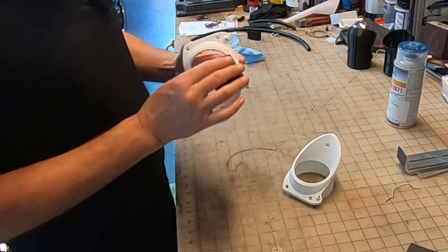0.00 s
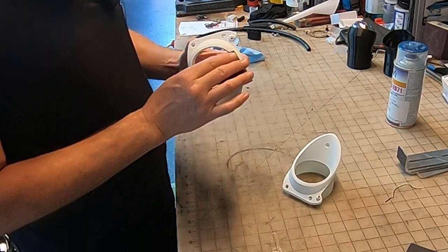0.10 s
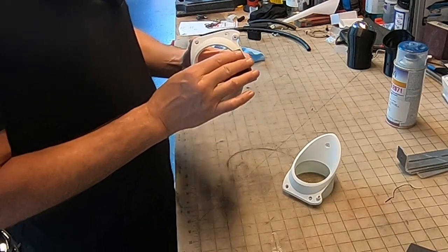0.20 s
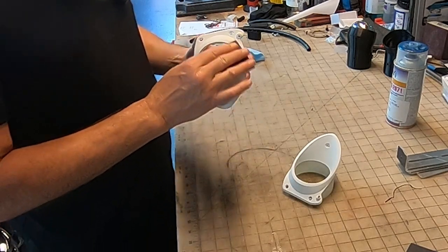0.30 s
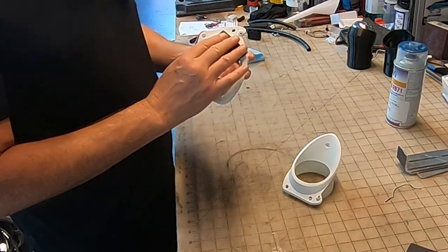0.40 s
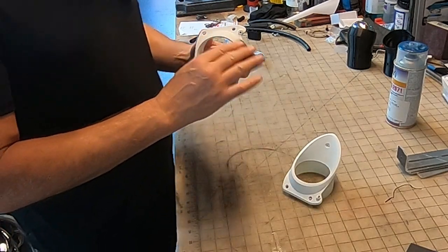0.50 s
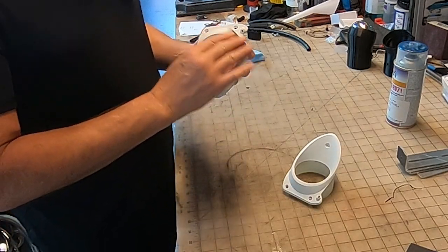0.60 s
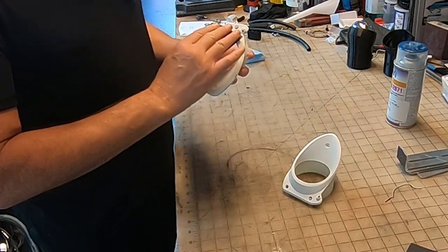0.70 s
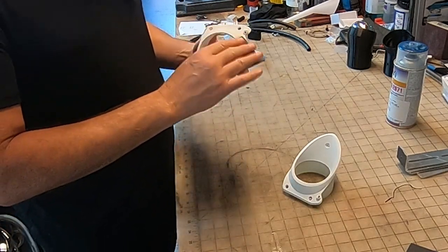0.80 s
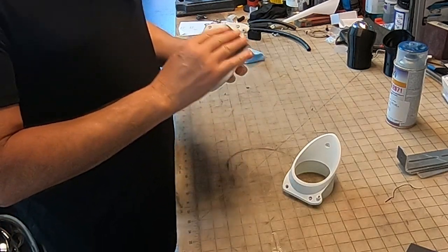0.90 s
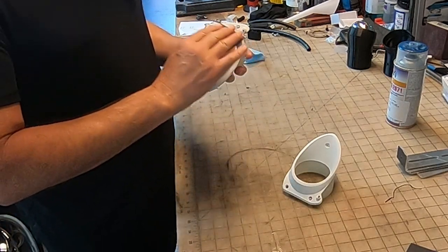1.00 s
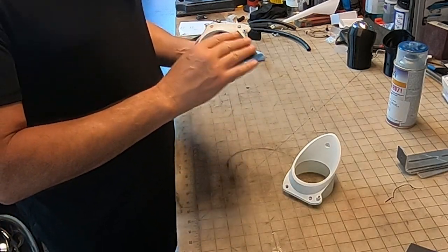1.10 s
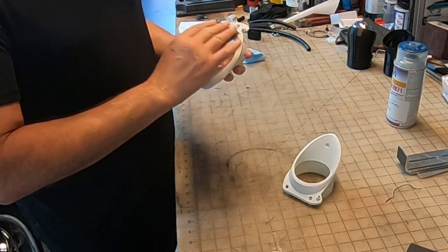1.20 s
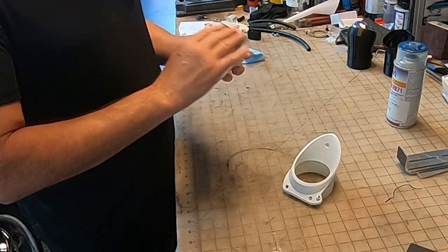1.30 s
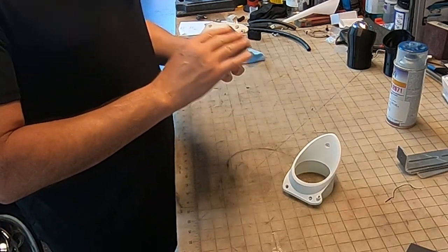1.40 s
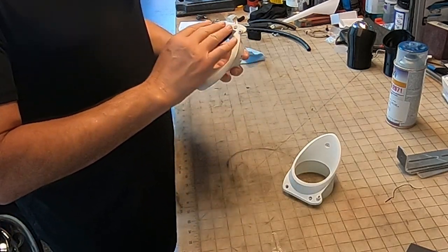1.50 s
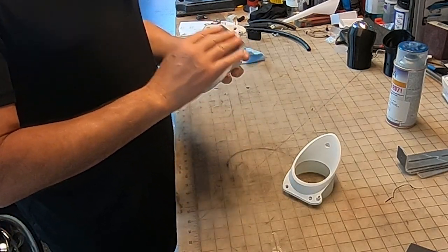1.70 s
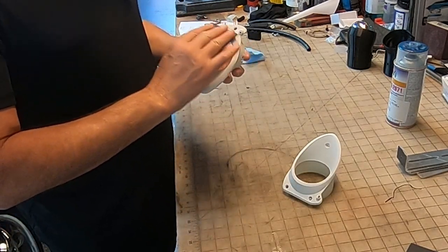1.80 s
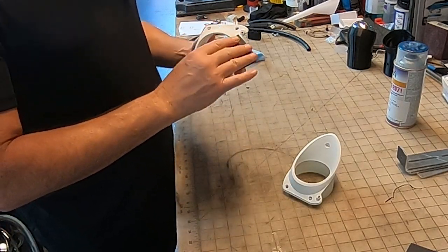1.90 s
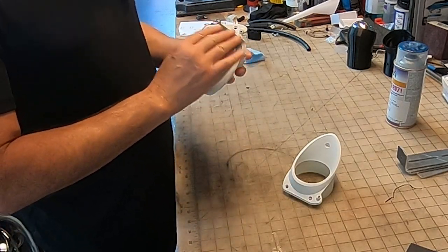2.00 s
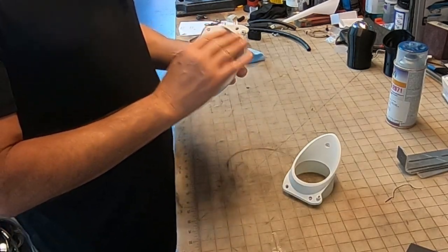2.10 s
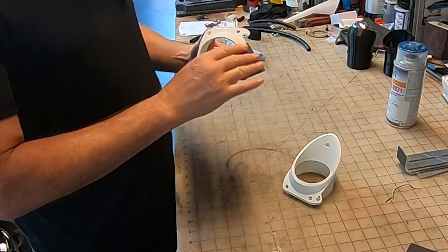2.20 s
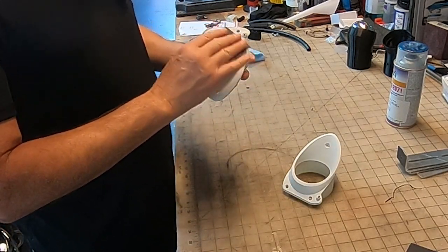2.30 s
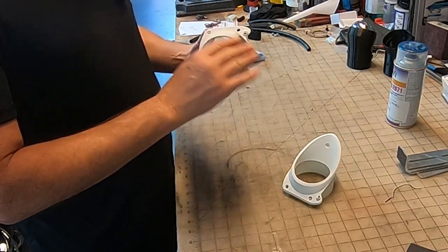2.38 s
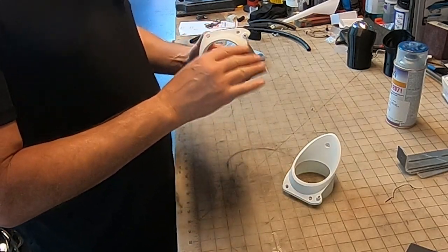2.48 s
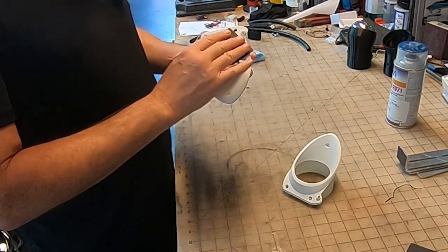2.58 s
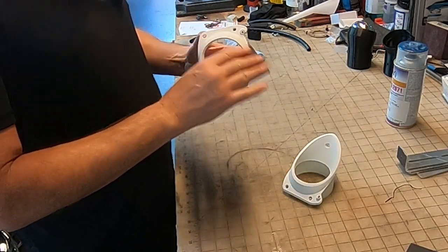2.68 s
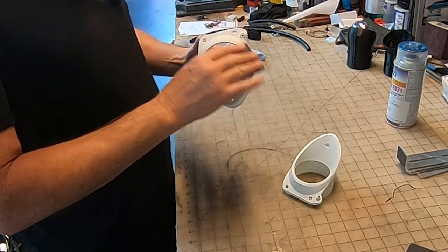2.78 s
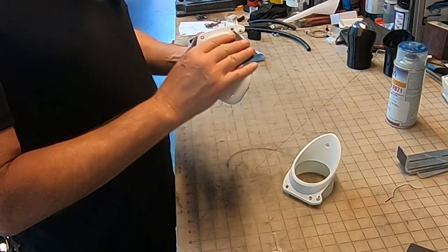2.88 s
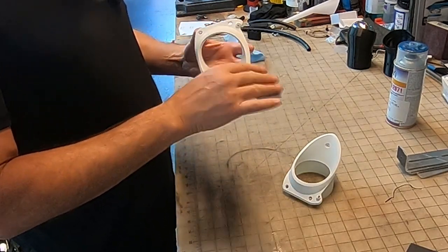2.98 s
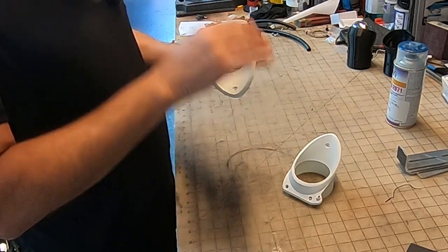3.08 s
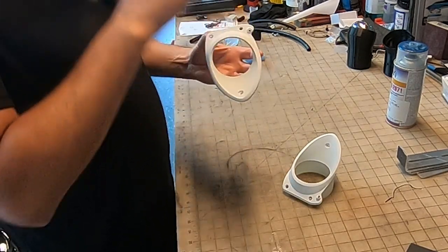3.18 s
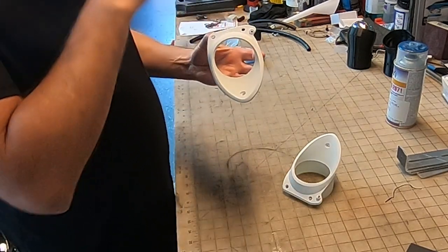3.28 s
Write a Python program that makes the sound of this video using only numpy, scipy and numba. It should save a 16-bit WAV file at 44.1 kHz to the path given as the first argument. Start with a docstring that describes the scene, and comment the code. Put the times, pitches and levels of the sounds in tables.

```python
"""In a workshop, a hand rubs sandpaper to and fro over a small plastic part, close to one microphone.
Grit clicks excite resonances of the paper (hiss) and of the part (ring); the paper bites harder around
some turns. Near the end the hand knocks softly on dull modes and a low rumble, filtered noise, swells.
Faint rustles and whistles are bands of noise; a short decaying room and a quiet hum lie beneath."""
import sys
import numpy as np
from scipy import signal
from scipy.fft import rfft, irfft
from scipy.io import wavfile
from scipy.ndimage import uniform_filter1d
from numba import njit

SR = 44100
rng = np.random.default_rng(int(sys.argv[2]) if len(sys.argv) > 2 else 0)


def field_ratio(decibels):
    """Amplitude ratio for a level in dB (20 dB per decade); scalars and array-likes work."""
    return 10 ** (np.asarray(decibels, dtype=float) / 20)


def to_wav(sig):
    """Store sig (one row per channel, or 1-D mono) as 16-bit WAV at the path in sys.argv[1].

    Samples outside -1..1 are clipped; the rate is SR.
    """
    pcm = np.clip(np.atleast_2d(sig), -1, 1) * 32767
    pcm = np.round(pcm).astype(np.int16)
    wavfile.write(sys.argv[1], SR, pcm.T)  # frames by channels


N = 145530  # samples

# strokes of the hand: (start [s], end [s], hiss at start [dB], hiss at end [dB],
# ring at start [dB], ring at end [dB])
STROKES = [(0.184, 0.257, -60, -43, -61, -54), (0.223, 0.412, -45.5, -40.5, -50, -51),
           (0.441, 0.533, -46, -43, -51, -52), (0.56, 0.719, -39.5, -43.5, -55.5, -48.5),
           (0.727, 0.823, -40, -42.5, -44.5, -61), (0.847, 0.995, -37.5, -49.5, -56, -54),
           (1.005, 1.122, -40.5, -50.5, -49.5, -66), (1.116, 1.269, -40.5, -46.5, -52, -55.5),
           (1.27, 1.39, -42.5, -46.5, -48.5, -63), (1.395, 1.531, -42.5, -52, -52.5, -55),
           (1.538, 1.665, -45.5, -44, -50, -59.5), (1.663, 1.809, -39, -56.5, -50, -61.5),
           (1.81, 1.905, -45, -44.5, -52.5, -58), (1.937, 2.077, -42.5, -50.5, -50.5, -61.5),
           (2.084, 2.179, -46.5, -52, -51, -65), (2.222, 2.355, -42, -49, -53.5, -57),
           (2.366, 2.453, -49, -47, -51, -79), (2.502, 2.628, -43.5, -47, -60.5, -56),
           (2.643, 2.716, -50, -56, -53, -80), (2.771, 2.899, -45, -49, -62.5, -52.5),
           (2.912, 3, -52, -48, -56, -60)]
# bites, the paper gripping harder: (start [s], end [s], initial hiss [dB], ring [dB])
BITES = [(0.521, 0.56, -43.5, -57.5), (0.803, 0.85, -43.5, -55.5), (1.888, 1.935, -38, -55.5),
         (2.147, 2.207, -38.5, -52), (2.417, 2.488, -40, -53.5), (2.679, 2.763, -38.5, -50),
         (2.957, 3.035, -41.5, -59.5)]
# drift of colour over the strokes: (time [s], rasp [dB], upper part modes [dB],
# top of the hiss [dB], lowest part modes [dB])
COLOUR_DRIFT = [ (.2, 0, -26, -3, 1), (.35, -9, 0.5, -0.5, -2), (.47, -6, -12.5, 4, 1), (.6, 5.5, -6, 1, 2),
                (.76, -9, -8, 1.5, -5), (.88, 4.5, -3, -2, 0.5), (1.04, 4, -2, 0.5, -0.5),
                (1.32, -0.5, -2.5, -1, 1), (1.6, 5, -3, 1, -1.5), (1.72, 0.5, 1, 0.5, -2),
                (1.97, 7.5, -2, -1.5, -1.5), (2.12, 0, -2.5, -0.5, -2.5), (2.47, 0.5, -6, 1.5, 0.5),
                (2.8, 3.5, -5.5, 0, 0), (3.0, 1, -3.5, 2.5, -4)]
# broad spectrum of the hiss: (frequency [Hz], relative density [dB])
HISS_SPECTRUM = [(350, -38), (700, -16.5), (1300, -10), (2700, -8), (3600, -7.5), (4700, -12.5), (5900, -8),
                 (7000, 0), (12300, 1), (15100, -3), (16000, 4)]
# resonances of the paper: (frequency [Hz], width [Hz], relative level [dB])
PAPER_MODES = [(3514, 760, 2), (4950, 410, 6.5), (6220, 280, 3.5), (7686, 510, -2), (9080, 1650, 0),
               (11360, 300, -6), (13480, 710, -3.5), (15160, 1200, 4.5)]
# modes of the plastic part: (frequency [Hz], width [Hz], relative level [dB])
PART_MODES = [(860, 57, -9.5), (1153, 200, -6.5), (1475, 188, 0), (1693, 215, 4.5), (2034, 410, 0.5),
              (2337, 254, 7.5), (2700, 630, 3)]
# knocks of the hand: (time [s], push level [dB])
KNOCKS = [(3.0298, -49), (3.037, -60), (3.041, -60)]
# dull modes struck by the knocks: (frequency [Hz], width [Hz], relative level [dB])
KNOCK_MODES = [(427, 120, 1), (600, 57, -7.5), (900, 24, -12), (194, 90, -13), (2200, 1500, -8)]
# faint paper rustles: (start [s], length [s], level [dB], frequency [Hz], width of first filter [Hz])
RUSTLES = [(3.02, 0.067, -69.5, 5970, 6000), (3.143, 0.026, -68.5, 5100, 2500),
           (3.144, 0.023, -71.5, 11700, 6000), (3.25, .09, -76.5, 670, 600)]
# faint whistles: (start [s], end [s], level [dB], frequency [Hz], width of first filter [Hz])
WHISTLES = [(.0, .16, -75, 1750, 80), (3.16, 3.33, -83, 3800, 500)]
# course of the low rumble: (time [s], level [dB])
RUMBLE_LEVEL = [(2.2, -95), (2.6, -68), (2.76, -81), (2.95, -66.5), (3.1, -62.5), (3.3, -80)]
# dull bumps within the rumble: (start [s], peak level [dB])
BUMPS = [(2.822, -60), (2.938, -55), (3.001, -57), (3.054, -68), (3.094, -56)]
# spectrum of the background noise: (frequency [Hz], relative density [dB])
SHOP_SPECTRUM = [(12, -46), (20, 0.5), (134, -9.5), (234, -11), (542, -6), (738, -12), (1030, -11.5),
                 (1710, -13.5), (2600, -18), (16000, -27.5)]
# hum lines: (frequency [Hz], width [Hz], rms level [dB])
HUM_LINES = [(44, 4.7, -86.5), (119.7, 1.3, -82), (189, 25, -85), (229.6, 9.5, -79.5)]

# rise and fall of each contact
STROKE_ATTACK_S, STROKE_RELEASE_S = 0.029, 0.039
RING_ATTACK_S, RING_RELEASE_S = 0.017, 0.026
BITE_ATTACK_S, BITE_RELEASE_S, BITE_SAG_DB = 0.008, 0.027, -5
# grit: mean click rate, mean and ceiling of the click level, level flutter
GRIT_PER_S, GRIT_SPREAD_DB, GRIT_TOP_DB = 11000, 2.7, 10
FLUTTER_DB, FLUTTER_PER_S = 1.4, 80
# slow random changes of the paper and of the modes (drift is a fraction of the pitch)
SURGE_DB, SURGE_PER_S = 1.5, 28
PART_WANDER_DB, PAPER_WANDER_DB, MODE_WANDER_PER_S = 1.5, 2.8, 55
MODE_DRIFT, DRIFT_PER_S = 0.018, 12
# modes of the part start low by this fraction, and settle with this time constant
LANDING_SAG, LANDING_S = 0.28, 0.041
LOW_MODES_HZ, UPPER_MODES_HZ, LOW_FOLLOW = 1300, 2200, 0.7  # LOW_FOLLOW: exponent on contact power
PAPER_BROAD_DB, TOP_OF_HISS_HZ = -3, 10500  # broad grit relative to the paper resonances
RASP_DB, BITE_RASP_DB = -13, -7.5  # relative to the hiss of the strokes and of the bites
RASP_HZ, RASP_WIDTH_HZ = 5165, 1020
DRAG_DB, DRAG_HZ, DRAG_RING_DB = -68, 3600, -72
RUMBLE_HZ, RUMBLE_WIDTH_HZ, RUMBLE_FLUTTER_DB = 205, 130, 1.5
BUMP_S, BUMP_HZ = 0.017, 200
ROOM_DB, ROOM_SPLIT_HZ = -13.5, 3200
ROOM_T60_LOW_S, ROOM_T60_HIGH_S = 0.25, 0.37
SHOP_DB = -71


def sanding():
    """Friction as excitation: each contact gates the paper's hiss and drives the part's modes."""
    strokes, bites, drag = hiss_contact()
    time_s, *drift_db = np.array(COLOUR_DRIFT, float).T
    t = np.arange(N) / SR
    rasp_gain, upper_gain, top_gain, low_gain = (field_ratio(np.interp(t, time_s, db)) for db in drift_db)
    grains = grit()
    surge = field_ratio(SURGE_DB * walk(SURGE_PER_S))
    hiss = np.sqrt(strokes + bites) * paper_hiss(grains, top_gain) * surge
    rasp = paper_rasp(strokes, bites, rasp_gain)
    part = part_ring(grains, ring_contact(drag), low_gain, upper_gain)
    return hiss + rasp + drag_scuff(grains, drag) + part


def hiss_contact():
    """Contact power: of the strokes, of the bites, and of the drag that persists through the turns."""
    strokes = sum(gate(start, end, STROKE_ATTACK_S, STROKE_RELEASE_S, db0, db1)
                  for start, end, db0, db1, _, _ in STROKES)
    bites = sum(gate(start, end, BITE_ATTACK_S, BITE_RELEASE_S, db, db + BITE_SAG_DB)
                for start, end, db, _ in BITES)
    # the paper never quite leaves the part at the turns
    drag = gate(STROKES[1][0], BITES[-1][1], STROKE_ATTACK_S, STROKE_RELEASE_S, 0, 0)
    return strokes, bites, drag


def ring_contact(drag):
    """Superposed driving power: strokes, bites and drag add as powers to excite the part."""
    strokes = sum(gate(start, end, RING_ATTACK_S, RING_RELEASE_S, db0, db1)
                  for start, end, _, _, db0, db1 in STROKES)
    bites = sum(gate(start, end, BITE_ATTACK_S, BITE_RELEASE_S, db, db) for start, end, _, db in BITES)
    return strokes + bites + field_ratio(DRAG_RING_DB) ** 2 * drag


def grit():
    """Impulsive excitation: dense clicks of uneven size as grains catch the surface."""
    hit, size, sign = rng.random((3, N))
    size_db = np.minimum(-GRIT_SPREAD_DB * np.log(size + 1e-9), GRIT_TOP_DB)
    clicks = (hit < GRIT_PER_S / SR) * field_ratio(size_db) * np.sign(sign - 0.5)
    return unit(clicks) * field_ratio(FLUTTER_DB * walk(FLUTTER_PER_S))


def paper_hiss(grains, top_gain):
    """Radiation of the sheet: broad grit noise plus resonances, with a drifting top."""
    resonances = unit(resonate(grit(), PAPER_MODES, PAPER_WANDER_DB))
    paper = colour(field_ratio(PAPER_BROAD_DB) * grains + resonances, HISS_SPECTRUM)
    dull = signal.filtfilt(*signal.butter(2, TOP_OF_HISS_HZ, fs=SR), paper)
    return dull + top_gain * (paper - dull)


def paper_rasp(strokes, bites, rasp_gain):
    """Band-limited friction: grit through two resonances, strengthened relative to hiss in the bites."""
    stroke_power = field_ratio(RASP_DB) ** 2 * rasp_gain ** 2 * strokes
    bite_power = field_ratio(BITE_RASP_DB) ** 2 * bites
    return np.sqrt(stroke_power + bite_power) * band(grit(), RASP_HZ, RASP_WIDTH_HZ)


def drag_scuff(grains, drag):
    """Sustained friction: a faint broad band of grit fills the turns between strokes."""
    broad = ring(ring(grains, DRAG_HZ, DRAG_HZ), DRAG_HZ, DRAG_HZ)
    return field_ratio(DRAG_DB) * np.sqrt(drag) * unit(broad)


def part_ring(grains, contact, low_gain, upper_gain):
    """Modal response: grit drives three groups of modes of the part, each with its own course."""
    lowest = [mode for mode in PART_MODES if mode[0] < LOW_MODES_HZ]
    middle = [mode for mode in PART_MODES if LOW_MODES_HZ <= mode[0] < UPPER_MODES_HZ]
    upper = [mode for mode in PART_MODES if mode[0] >= UPPER_MODES_HZ]
    push = np.sqrt(contact) * grit() / np.std(resonate(grains, PART_MODES, 0))
    # pitch rises as the hand settles
    since_landing = np.maximum(np.arange(N) / SR - STROKES[0][0], 0)
    bend = 1 - LANDING_SAG * np.exp(-since_landing / LANDING_S)
    # the lowest modes follow the stroke less closely and linger into the turns
    evening = (contact / np.mean(contact) + 1e-6) ** ((LOW_FOLLOW - 1) / 2)
    out = resonate(push, middle, PART_WANDER_DB, bend)
    out = out + resonate(push * low_gain * evening, lowest, PART_WANDER_DB, bend)
    return out + resonate(push * upper_gain, upper, PART_WANDER_DB)


def resonate(x, modes, wander_db, bend=1.0):
    """Modal superposition: the shares and pitches of the modes wander as the grip shifts."""
    out = 0
    for k, (hz, width_hz, db) in enumerate(modes):
        share = field_ratio(wander_db * walk(MODE_WANDER_PER_S))
        pitch = hz * bend * (1 + MODE_DRIFT * walk(DRIFT_PER_S))
        # narrow modes are raised, since they pass less of the noise; signs alternate
        gain = (-1) ** k * field_ratio(db) * np.sqrt(SR / 20 / width_hz)
        out = out + gain * glide(x * share, pitch, 1.0 * width_hz)
    return out


@njit
def glide(x, hz, width_hz):
    """Second-order resonance of moving centre: a state-variable filter with unit peak gain."""
    y, band_state, low_state = np.empty(len(x)), 0.0, 0.0
    for i in range(len(x)):
        g, damping = np.tan(np.pi * hz[i] / SR), width_hz / hz[i]
        v = (band_state + g * (x[i] - low_state)) / (1 + g * (g + damping))
        band_state = 2 * v - band_state
        low_state = low_state + 2 * g * v
        y[i] = damping * v
    return y


def gate(start, end, attack, release, db0, db1):
    """Power envelope of one contact: smooth rise, hold sloping in level, smooth fall."""
    t = np.arange(N) / SR
    edge = np.clip((t - start) / attack, 0, 1) * np.clip((end - t) / release, 0, 1)
    slope = field_ratio(np.interp(t, [start + attack, end], [db0, db1]))
    return (np.sin(np.pi / 2 * edge) ** 2 * slope) ** 2


def walk(rate):
    """Slow random modulation: levels held 1 / rate seconds and smoothed twice."""
    hold = int(SR / rate)
    steps = np.repeat(rng.standard_normal(N // 50), hold)[:N]
    return 1.25 * uniform_filter1d(uniform_filter1d(steps, hold), hold)


def ring(x, hz, width_hz):
    """Second-order resonance with unit gain at its centre."""
    return signal.lfilter(*signal.iirpeak(hz, hz / width_hz, fs=SR), x)


def band(x, hz, width_hz):
    """Cascaded resonances, the second twice as wide, normalised to unit rms."""
    return unit(ring(ring(x, hz, width_hz), hz, 2 * width_hz))


def colour(x, spectrum):
    """Spectral shaping: gain interpolated in dB over log frequency, then unit rms."""
    hz, db = np.array(spectrum, float).T
    f = np.maximum(np.arange(len(x) // 2 + 1) * SR / len(x), 1)
    gain = field_ratio(np.interp(np.log(f), np.log(hz), db))
    return unit(irfft(rfft(x) * gain, len(x)))


def unit(x):
    """Normalisation to unit rms."""
    return x / np.sqrt(np.mean(x ** 2))


def knocks():
    """Impact excitation: soft, brief pushes of the hand set dull modes ringing."""
    push = np.zeros(N)
    for time_s, db in KNOCKS:
        push[int(time_s * SR)] = field_ratio(db)
    push = np.convolve(push, np.hanning(24))[:N]  # about half a millisecond long
    return sum(field_ratio(db) * ring(push, hz, width_hz) * 1200 / width_hz for hz, width_hz, db in KNOCK_MODES)


def rumble():
    """Narrow-band noise of uneven level that swells near the end, with sine bumps of a few cycles."""
    time_s, db = np.array(RUMBLE_LEVEL).T
    t = np.arange(N) / SR
    noise = ring(rng.standard_normal(N), RUMBLE_HZ, RUMBLE_WIDTH_HZ)
    noise = ring(noise, RUMBLE_HZ, 1.03 * RUMBLE_WIDTH_HZ)
    out = unit(noise) * field_ratio(np.interp(t, time_s, db, left=-120) + RUMBLE_FLUTTER_DB * walk(45))
    for (start, peak_db), (detune, phase) in zip(BUMPS, rng.random((len(BUMPS), 2))):
        shape = np.sin(np.pi * np.clip((t - start) / BUMP_S, 0, 1)) ** 2
        hz = BUMP_HZ * (0.9 + 0.2 * detune)
        out = out + field_ratio(peak_db) * shape * np.sin(2 * np.pi * (hz * t + phase))
    return out


def rustles():
    """Gated band noise: faint brief rustles of the paper."""
    return sum(faint_noise(start, start + length, db, hz, width_hz)
               for start, length, db, hz, width_hz in RUSTLES)


def whistles():
    """Narrow gated noise: the ear hears a faint, breathy pitch."""
    return sum(faint_noise(*whistle) for whistle in WHISTLES)


def faint_noise(start, end, db, hz, width_hz):
    """Resonance-filtered noise under an amplitude gate."""
    edges = (0.0077, 0.011) if width_hz > 500 else (0.0054, 0.03)  # attack, release [s]
    return np.sqrt(gate(start, end, *edges, db, db)) * band(rng.standard_normal(N), hz, width_hz)


def room(x):
    """Diffuse reverberation: exponentially decaying noise, starting 6 ms late."""
    t = np.arange(SR // 2) / SR
    noise = rng.standard_normal(len(t)) * (t > 0.006)
    low = signal.lfilter(*signal.butter(2, ROOM_SPLIT_HZ, fs=SR), noise)
    tail = low * field_ratio(-60 * t / ROOM_T60_LOW_S) + (noise - low) * field_ratio(-60 * t / ROOM_T60_HIGH_S)
    return field_ratio(ROOM_DB) * signal.fftconvolve(x, tail / np.sqrt(np.sum(tail ** 2)))[:N]


def shop():
    """Stationary background: shaped noise plus hum lines that waver as narrow-band noise does."""
    hum = sum(field_ratio(db) * unit(ring(rng.standard_normal(N), hz, width_hz)) for hz, width_hz, db in HUM_LINES)
    return field_ratio(SHOP_DB) * colour(rng.standard_normal(N), SHOP_SPECTRUM) + hum


def scene():
    """Superposition: near sounds with their room, knocks and rumble, over the shop."""
    near = sanding() + rustles() + whistles()
    mono = near + room(near) + knocks() + rumble() + shop()
    return np.array([mono, mono])


def band_limit(x):
    """A steep low-pass at the top of the band."""
    return signal.sosfilt(signal.butter(12, 16150, fs=SR, output="sos"), x)


def record(dry):
    """Band limitation: a steep elliptic low-pass removes the top of both identical channels."""
    low_pass = signal.ellip(14, 0.3, 85, 15760, fs=SR, output="sos")  # ripple [dB], stop [dB], edge [Hz]
    mix = signal.sosfilt(low_pass, dry)
    return band_limit(mix)


dry = scene()
out = record(dry)
to_wav(out)
```